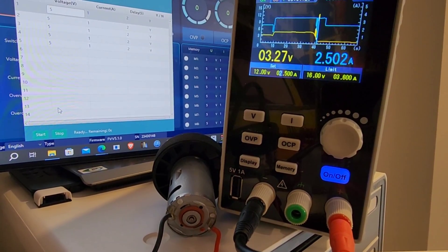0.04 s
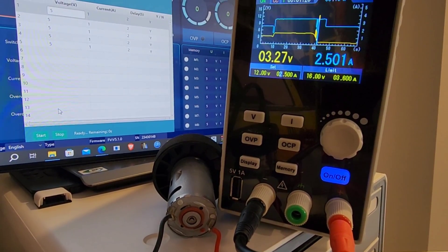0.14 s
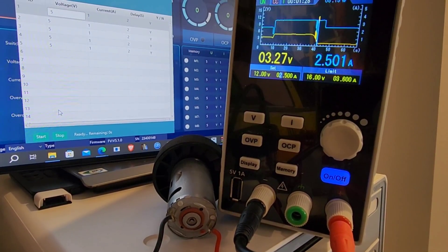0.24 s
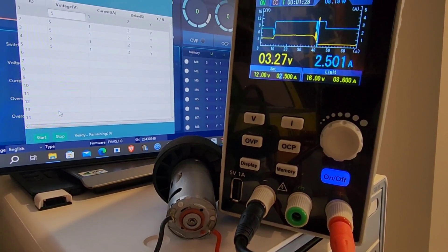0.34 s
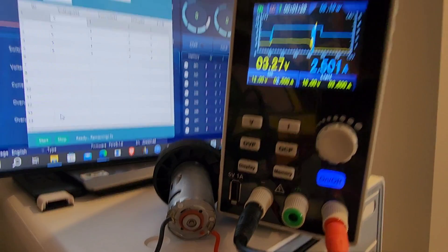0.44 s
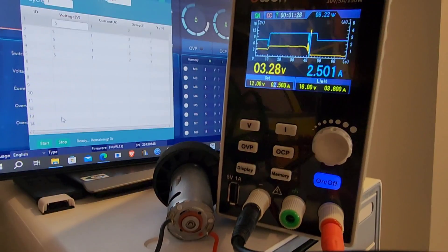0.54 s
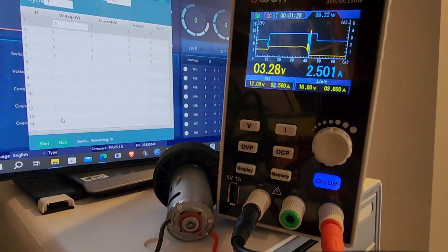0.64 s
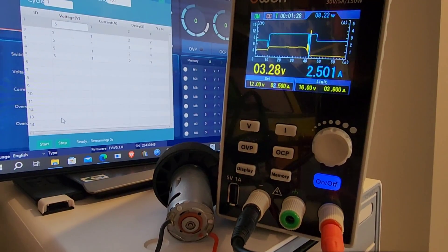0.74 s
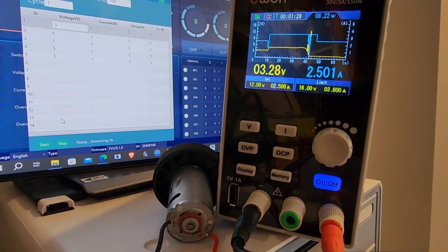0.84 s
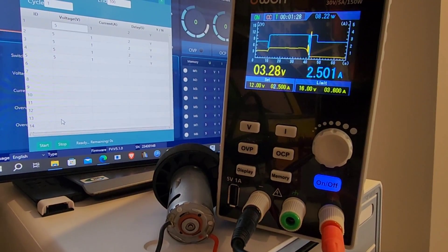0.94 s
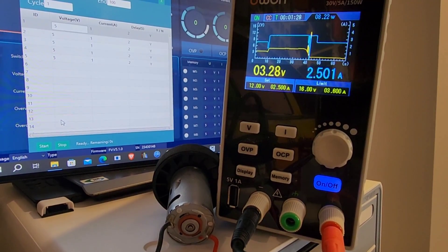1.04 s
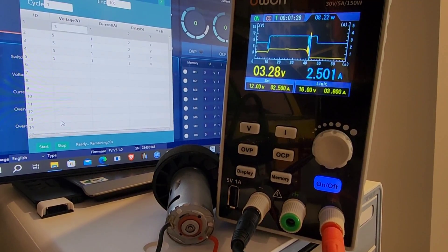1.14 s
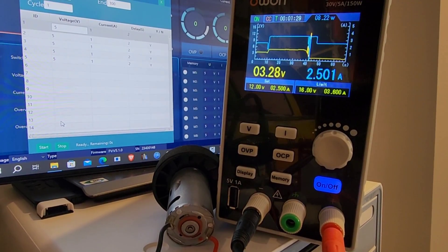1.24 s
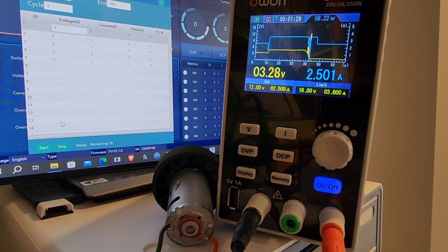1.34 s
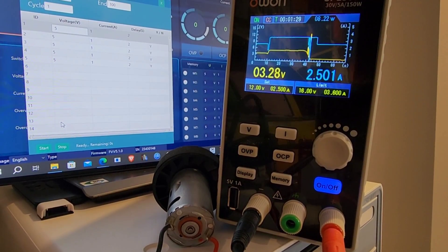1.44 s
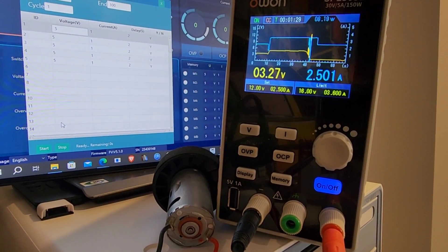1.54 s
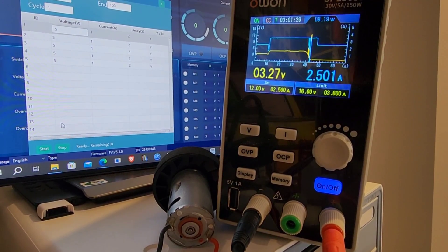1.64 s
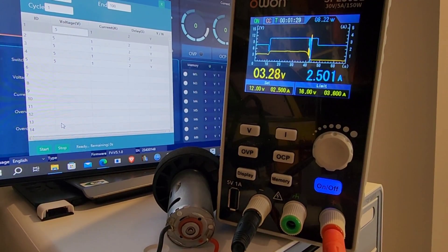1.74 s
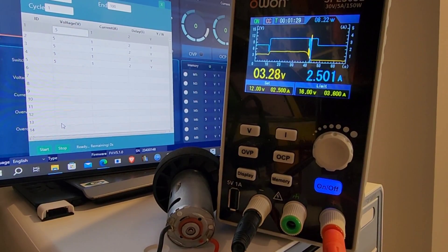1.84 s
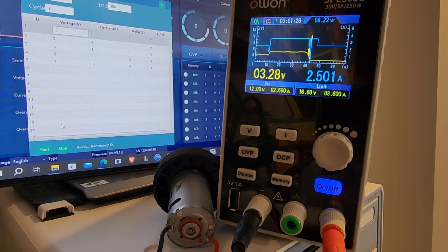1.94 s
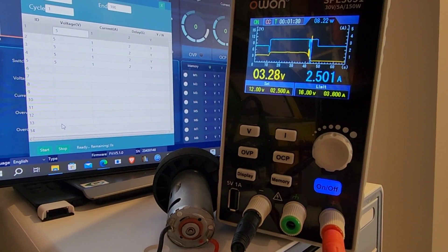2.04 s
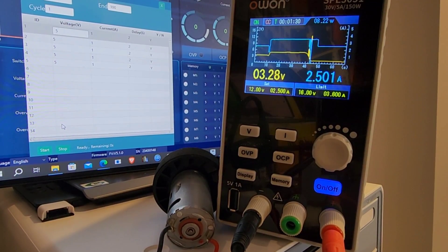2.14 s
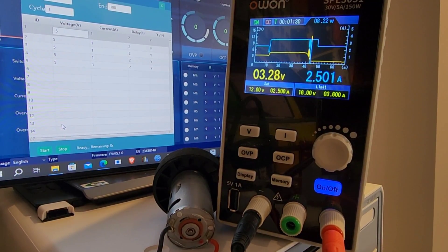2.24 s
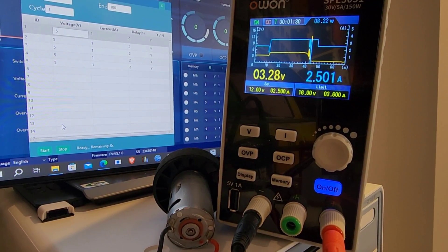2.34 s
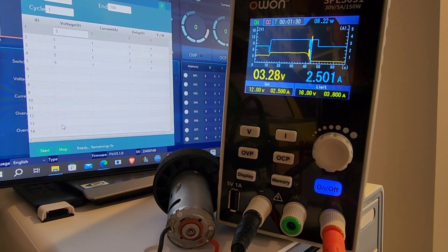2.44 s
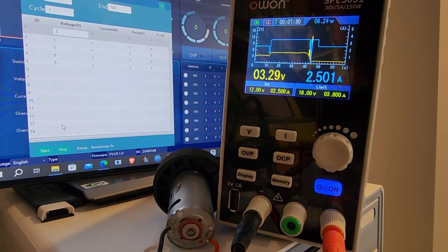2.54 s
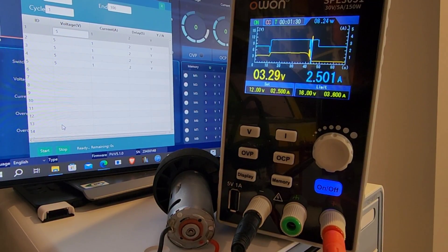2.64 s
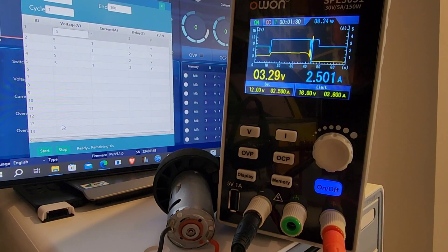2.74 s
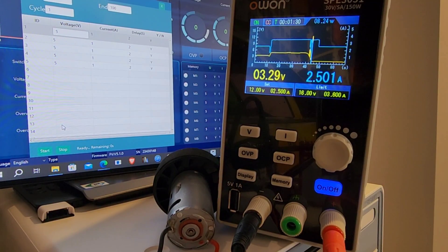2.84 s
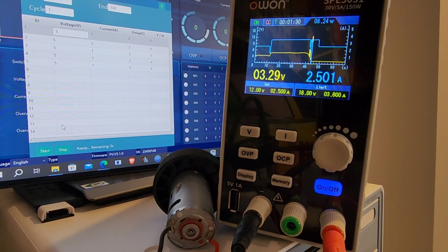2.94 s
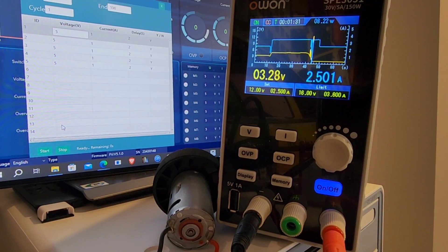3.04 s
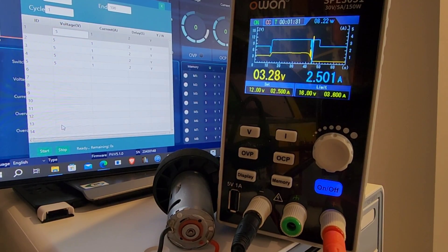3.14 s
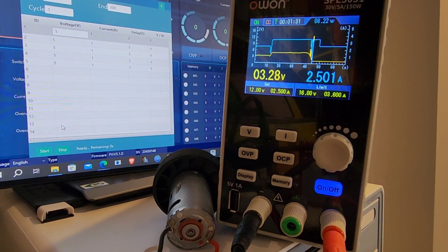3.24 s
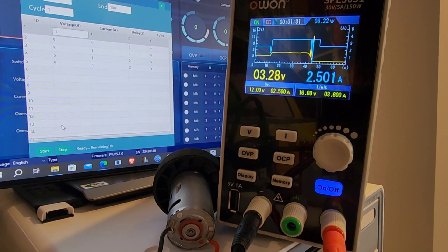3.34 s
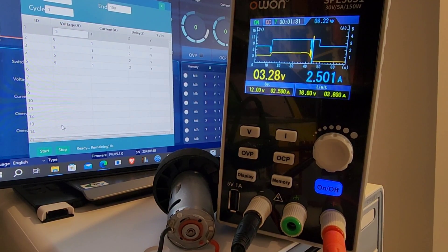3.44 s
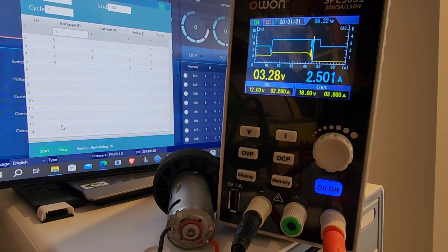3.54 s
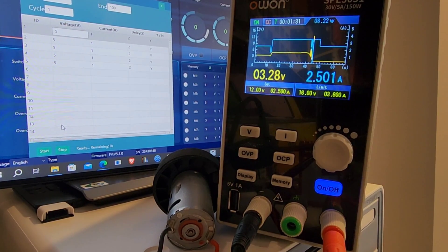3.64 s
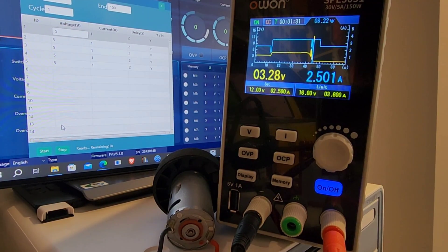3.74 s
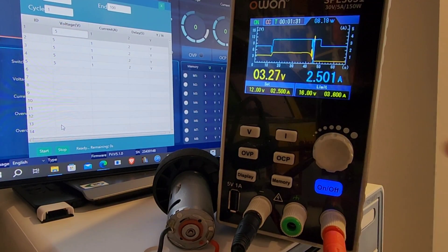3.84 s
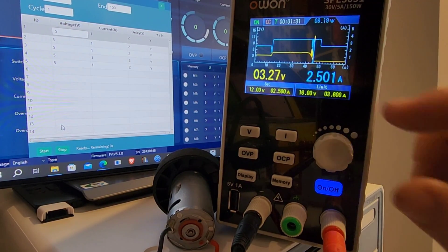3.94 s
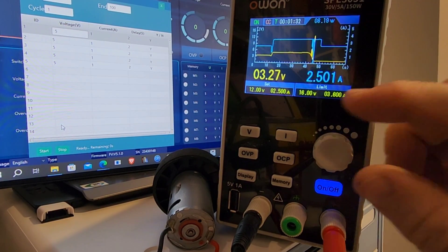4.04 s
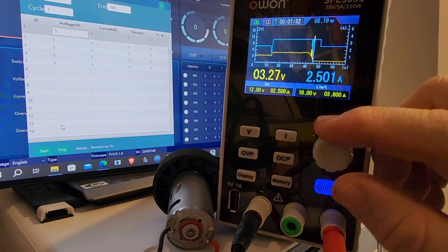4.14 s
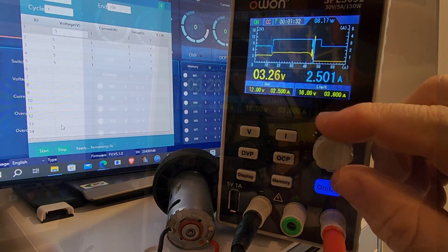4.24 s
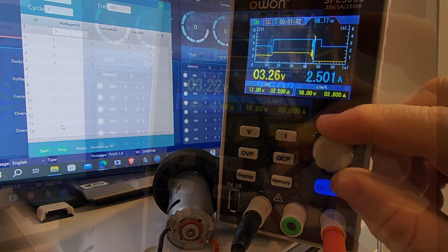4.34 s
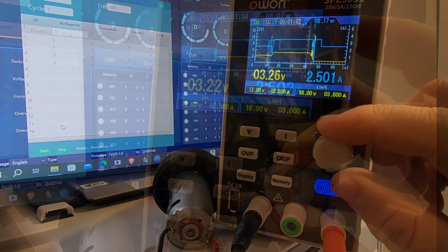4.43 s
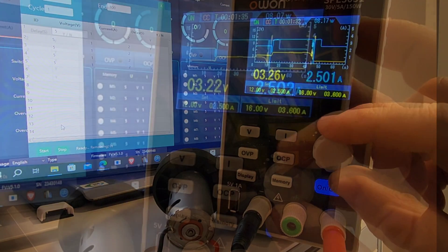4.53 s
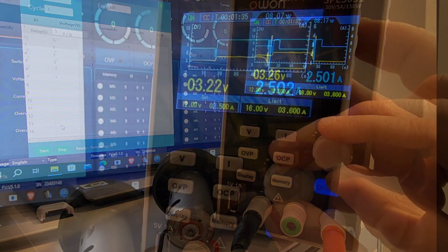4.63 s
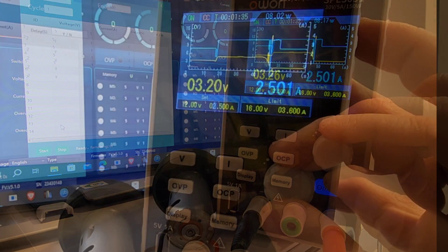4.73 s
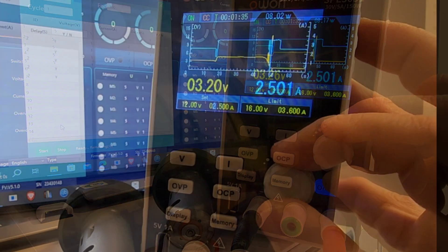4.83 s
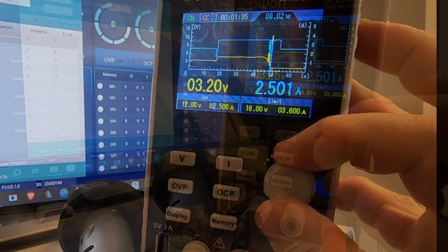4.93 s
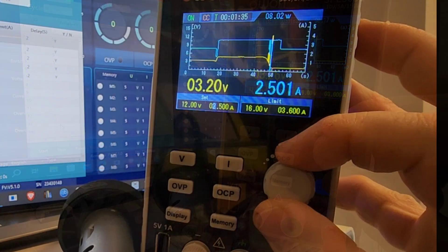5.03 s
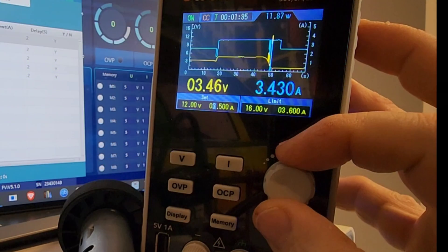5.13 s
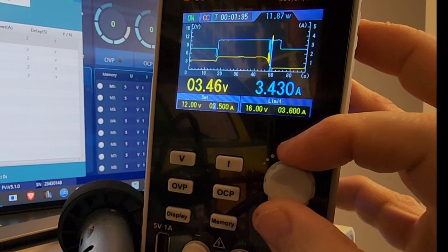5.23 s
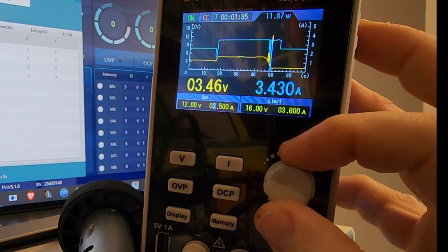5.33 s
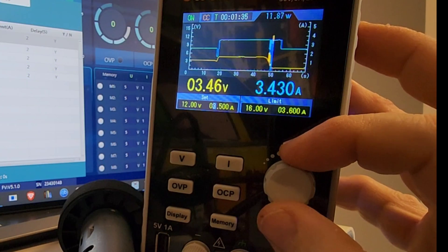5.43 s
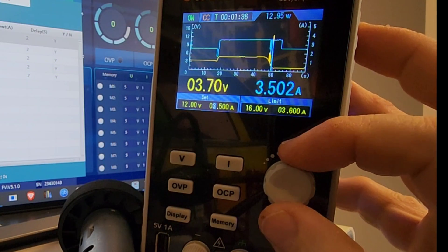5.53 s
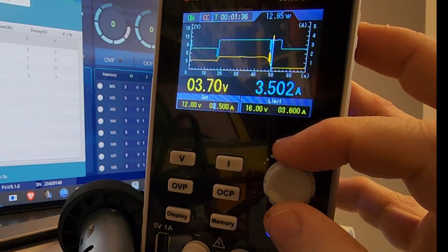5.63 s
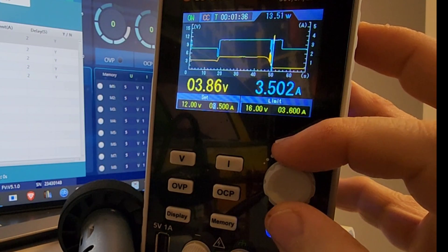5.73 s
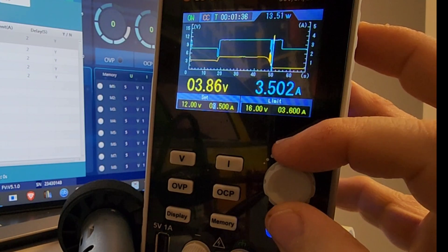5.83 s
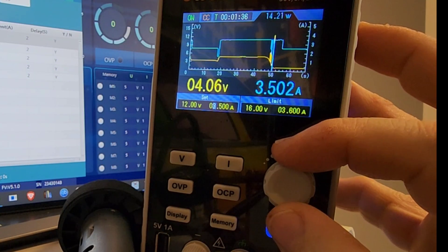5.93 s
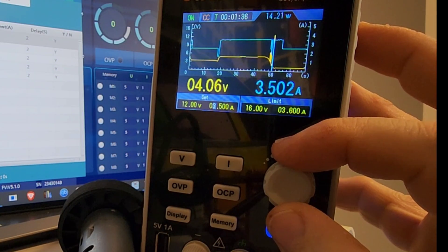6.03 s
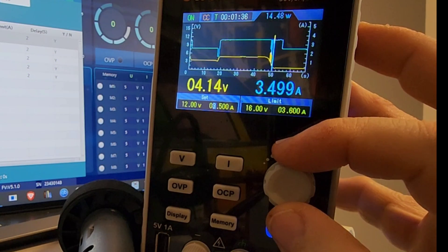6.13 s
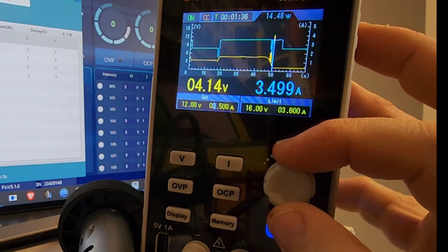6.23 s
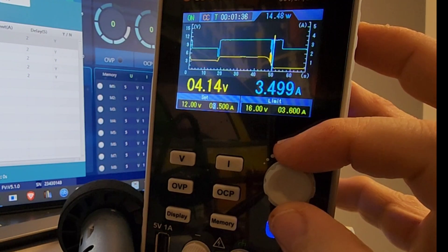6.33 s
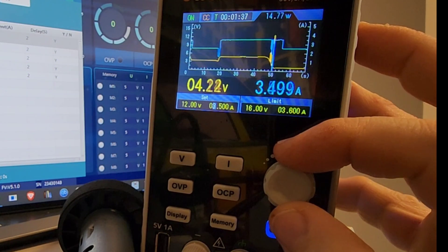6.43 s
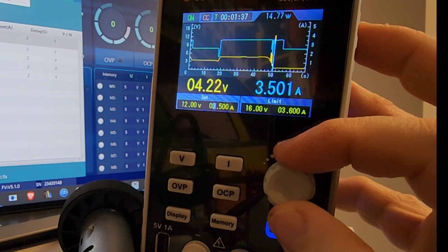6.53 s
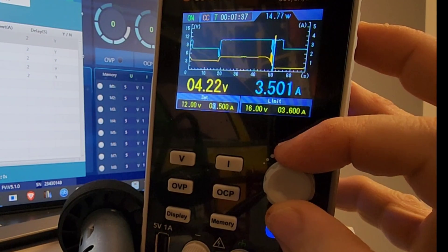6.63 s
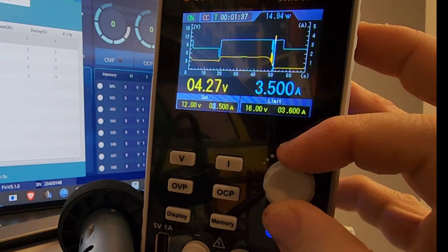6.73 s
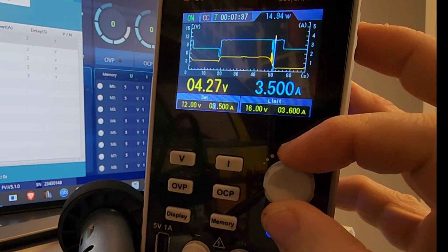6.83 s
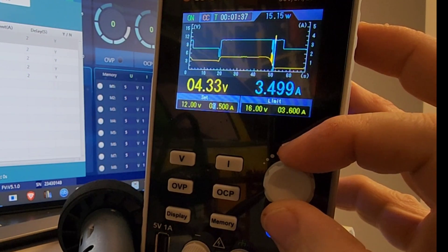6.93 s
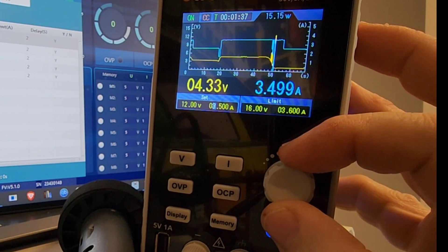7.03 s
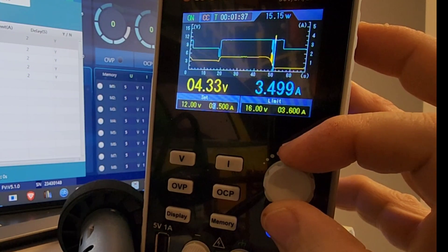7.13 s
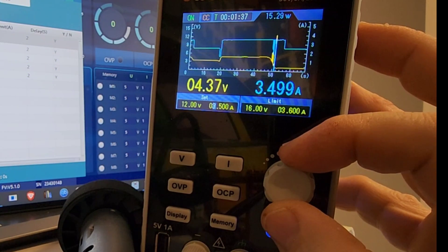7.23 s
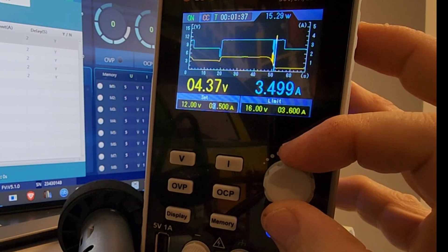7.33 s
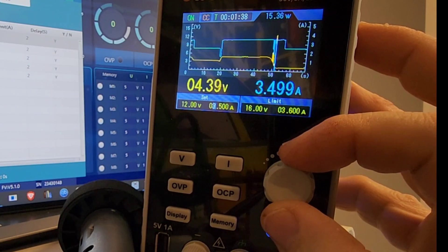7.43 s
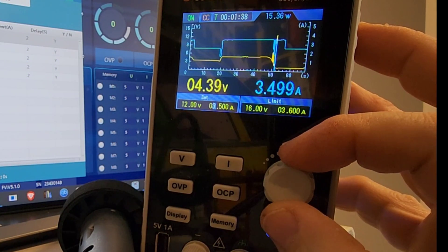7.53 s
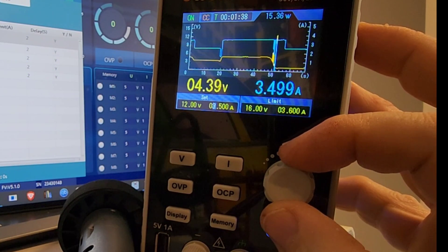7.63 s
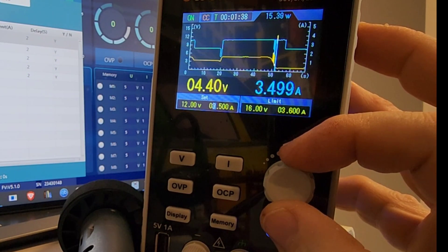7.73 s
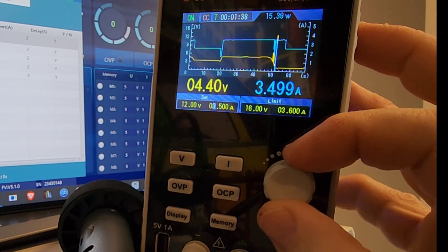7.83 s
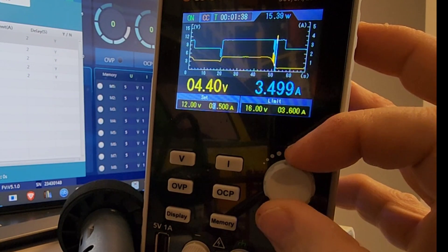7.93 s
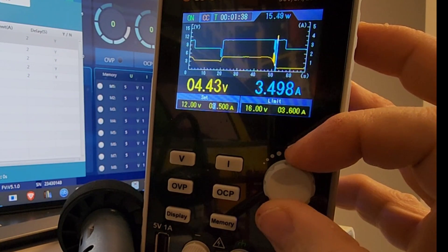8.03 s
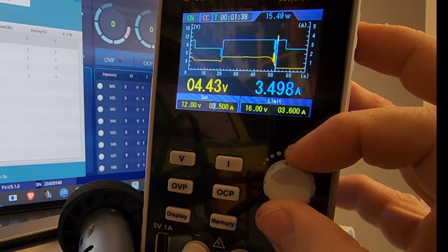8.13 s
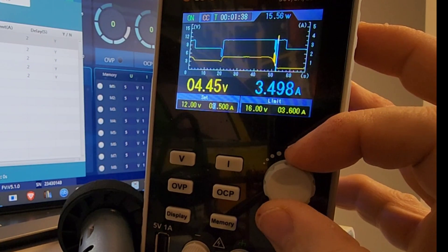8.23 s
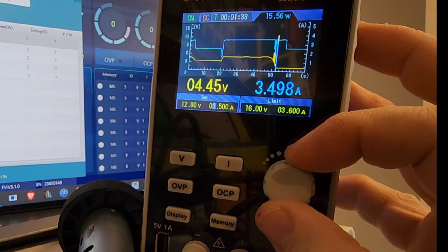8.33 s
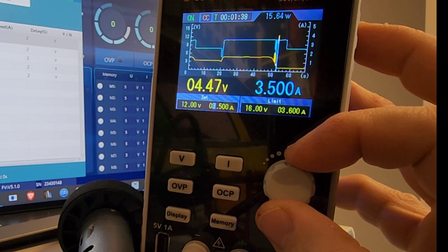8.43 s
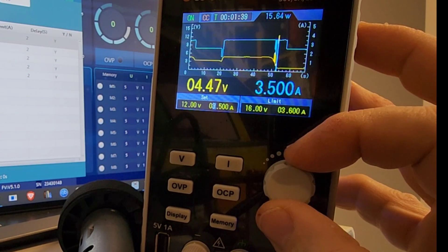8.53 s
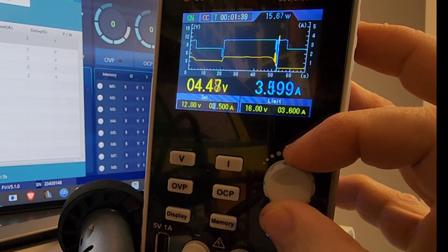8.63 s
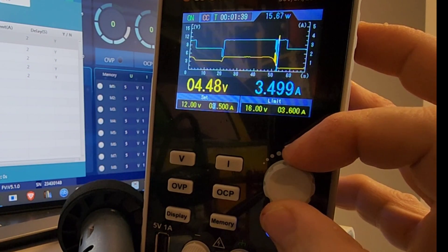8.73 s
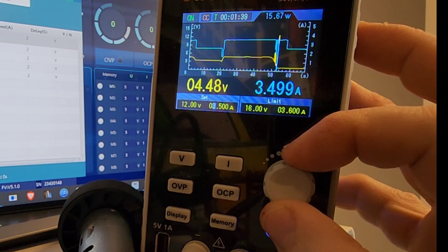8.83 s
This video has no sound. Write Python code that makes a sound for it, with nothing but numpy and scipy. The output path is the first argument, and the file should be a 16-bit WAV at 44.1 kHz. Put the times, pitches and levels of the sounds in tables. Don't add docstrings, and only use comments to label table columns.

```python
import sys
import numpy as np
from scipy import signal
from scipy.fft import rfft, irfft, next_fast_len
from scipy.io import wavfile

SR = 44100
rng = np.random.default_rng(int(sys.argv[2]) if len(sys.argv) > 2 else 0)


def boost_factor(decibels):
    exponent = np.asarray(decibels, float) / 20
    return 10 ** exponent


def to_wav(s):
    ch = np.atleast_2d(s).T
    pcm = np.round(np.clip(ch, -1, 1) * 32767)
    wavfile.write(sys.argv[1], SR, pcm.astype(np.int16))


N = 391166

# frequency in Hz, density in dB per Hz.
RUMBLE_SPECTRUM = [(11, -35), (18, -10), (38, -8), (54, 2), (76, -2), (162, -13.5), (232, -15.5),
                   (240, -15), (310, -45), (530, -120)]
# start in seconds, peak in dB, pitch in Hz, T60 in seconds.
THUDS = [(.04, -20, 89.5, 0.041), (.10, -16, 49.7, 0.19), (.365, -13, 60, 0.15), (0.425, -6, 110, .06),
         (.44, -9, 60, 0.096), (0.692, -6, 122, 0.021), (0.824, -12, 99, 0.029), (.945, -19, 130, 0.046),
         (1.975, -18, 51, .15), (2.088, -16, 50.7, 0.25), (2.802, -5, 70.5, 0.069), (2.901, -12, 55, .1),
         (3.122, -9.5, 47.7, 0.31), (3.152, -10, 55, 0.087), (3.23, -15, 59.4, 0.087),
         (3.68, -22, 200, .04), (3.755, -7, 150, 0.049), (3.849, -12, 55, .1)]
# centre in seconds, swell in dB, half length in seconds.
GRIP_SWELLS = [(0, 9, 0.076), (0.416, 12.5, 0.05), (.56, 9, 0.14), (1.6, -1, 0.23), (2.0, 3, 0.063),
               (2.153, 6, 0.053), (2.72, 5, .2), (3.15, 0.5, .15), (3.9, 3.5, 0.26), (5.62, 3, 0.13),
               (6.83, 3, .15), (7.4, 2.5, .2), (8.87, 1, .08)]
RUMBLE_DB, RUMBLE_DUCKS, DUCK_BELOW_DB = -36, 0.49, -12

# start in seconds, height re full scale, swing in Hz, decay in seconds, rise
# in seconds, share of outside sound let through.
KNOCK = [
    (.4759, 5.48, 50.2, .0044, .00375, .02),
    (.4889, 1.59, 67.5, .0021, .00067, .2),
    (.4952, -1.3, 122.5, .0024, .0001, .02),
    (.4985, .63, 40.8, .05, .00054, .3),
    (.5044, -7.0, 36.7, .0058, .00857, .01),
    (.519, -.45, 49.3, .0265, .0005, 1),
]
# time in seconds, level in dB.
LOUDNESS = [(0, -18.5), (.3, -15), (.47, -13.5), (.53, -22.5), (1.0, -22.5), (1.7, -22), (1.97, -17),
            (2.2, -15), (2.55, -13), (4.0, -13), (4.36, -13.5), (4.73, -16), (4.94, -15.5), (5.08, -13.5),
            (5.38, -11), (5.87, -9.5), (8.4, -10), (8.87, -10.5)]
# until in seconds, from in seconds.
POSE_S = (.47, .53, 2.9, 3.9, 4.3, 5.0)

DISSOLVE = (4.3, 5.06, 2.9, 4.695)
# time in seconds, speed in turns per second.
IDLE_SPEED = [(0, 272.4), (.5, 272.2), (2.5, 272.8), (3, 272.7), (4.3, 272.0)]
# gain in turns per second, time constant in seconds.
SETTLING = [
    (74.55, .7123),
    (35.51, 2.218),
]
TURN_UP_S, LATER_IDLE_HZ = 5.0465, 269.1
SLOW_HZ, FAST_HZ = 272, 368
SLIP_S = 5.252

# frequency in Hz, density in dB per Hz.
HISS_SLOW = [(230, -21.5), (430, -16), (620, -19.5), (950, -15), (1300, -15.5), (1750, -4), (2200, -5.5),
             (3000, -2), (3900, -1), (5000, -5), (7500, -19.5), (10500, -23.5), (11600, -34.5),
             (12200, -66)]
HISS_FAST = [(230, -18.5), (430, -13.5), (620, -22.5), (950, -16.5), (1300, -14.5), (1750, -5),
             (2200, -10.5), (3000, -3.5), (3900, -3.5), (5000, -4.5), (7500, -19.5), (10500, -22.5),
             (11600, -35), (12200, -75)]
# centre in Hz, width in Hz, lift in dB when slow, lift in dB when fast.
CAN_RESONANCES = [(1174, 73, 0, -9), (1846, 79, 5.5, 5), (2705, 110, 3.5, 7.5), (2977, 29, -3, -0.5),
                  (3063, 37, 6, 8), (3290, 86, -1, -1.5), (3528, 77, 5, 9.5), (3640, 53, 4.5, 5.5),
                  (3834, 84, 3.5, 4), (3980, 120, 4, 8), (4650, 84, 0.5, 6), (5087, 100, 3, 5.5),
                  (5240, 75, 5, 4.5), (6900, 87, 2, 0.5)]

FAINT_MULTIPLES = (4.113, 5.11, 5.225, 17, 19, 22, 23, 24, 28, 30)
# level in dB re hiss when slow, level in dB re hiss when fast.
FAINT_DB = [(-31.5, -33.5), (-34, -41), (-25, -42), (-22, -46), (-28, -38), (-46, -48), (-46, -38),
            (-46, -50), (-48, -46), (-33, -60)]

# level in dB before the knock, after it, leaning in, close up,
# gain in dB at full speed.
ROTOR_DB = [(-18.5, -17.5, -17.5, -19.5, 11), (-27.4, -26.8, -28, -34, 8), (-27, -29.5, -26.5, -16, 1.5),
            (-27, -30, -20, -18.5, -18)]
BEARING_DB = [(-36, -38, -36, -35.5, 1), (-36, -33, -33, -32, 1), (-34, -30.5, -34, -30, -1)]
SLOT_DB = [(-29, -29, -26, -31, 1), (-20, -19.5, -27, -24.5, 6), (-21, -20, -16, -16, -2.5),
           (-31, -24, -18.5, -24, 4), (-26, -38, -38, -34, 9.5), (-26, -21, -24, -25, -4),
           (-13.5, -9.5, -8, -12.5, -16), (-21, -23, -28, -24, -13), (-26, -21.5, -18, -28, -9),
           (-32, -32, -29, -29, -6)]
BAR_DB = [(-28.5, -24, -25, -25.5, 8.8), (-19.3, -16, -20.7, -19, 3.8)]

# centre in Hz, width in Hz, lift in dB.
BENCH_PATH = [(286, 12, 10), (300.4, 37, 6), (323, 8, -4.5), (345.4, 5.2, -15), (355.7, 5.6, 2),
              (588, 55, 6), (628, 10, -10), (676, 47, 10.5), (705, 6, -10), (724, 5.5, 7), (732, 4.5, -8.5),
              (828, 20, -18), (877, 31, -18), (963, 50, 0.5), (1040, 9, -2), (1080, 24, 6),
             (1124.7, 9.9, -28), (1166, 52, -9), (1280, 25, -15), (1460, 9, -11)]
SHIELD_PATH = [(642, 30, 8), (674, 30, 13.5), (710, 5, -6), (700, 4.5, 5), (758, 8, 5), (768, 9.2, 10),
               (1038, 38, 16.5), (1100, 18, 12), (1120, 6, -15), (1152, 4, -10), (1224, 82, 10),
               (1285, 20, -12), (1380, 39, 9), (1565, 8, -4)]
CAN_PATH = [(1700, 60, 1), (1815, 55, 9), (1935, 39, -11), (2010, 28, 4), (2120, 450, -6), (2140, 13, 6),
            (2207, 40, 1), (2310, 63, -22), (2400, 40, -17), (2610, 13, 4.5), (2670, 60, 11), (3110, 40, 4),
            (3180, 90, -7),
            (4040, 70, 3), (4330, 80, 2), (4550, 130, 11), (4720, 60, -4), (5100, 60, -3),
                (5500, 300, 3), (6000, 120, 12), (6700, 40, 12)]
COMMUTATOR_PATH = [(3700, 100, 6), (4100, 70, 6), (4310, 50, -9), (4426, 29, -10), (4458, 63, 9),
                   (4780, 60, 4), (4960, 50, -1), (5050, 30, -6), (5215, 25, 7.5)]


def in_time(rows):
    s, *columns = np.transpose(rows)
    return [np.interp(np.arange(N) / SR, s, c) for c in columns]


def rms_one(x):
    return x / np.sqrt(np.mean(x ** 2))


def drift(rate_hz):
    step = 64
    r = np.exp(-2 * np.pi * rate_hz * step / SR)
    slow = signal.lfilter([1], [1, -2 * r, r * r], rng.standard_normal(N // step + 1002))[1000:]
    return np.interp(np.arange(N) / step, np.arange(len(slow)), rms_one(slow - slow.mean()))


def resonant_lift(hz, path):
    return sum(lift_db / (1 + (2 * (hz - centre) / width) ** 2) for centre, width, lift_db in path)


def coloured(x, spectrum, peaks=()):
    size = next_fast_len(N)
    hz = np.maximum(np.arange(size // 2 + 1) * SR / size, 1)
    corner_hz, corner_db = np.transpose(spectrum)
    level_db = np.interp(np.log(hz), np.log(corner_hz), corner_db, right=-120)
    level_db = level_db + resonant_lift(hz, peaks)
    return rms_one(irfft(rfft(x, size) * boost_factor(level_db), size)[:N])


def grip_level(hiss_db):
    t = np.arange(N) / SR
    swells_db = sum(swell_db * np.exp(-((t - s) / half_s) ** 2) for s, swell_db, half_s in GRIP_SWELLS)
    return RUMBLE_DB + RUMBLE_DUCKS * np.minimum(hiss_db - DUCK_BELOW_DB, 0) + swells_db


def handling(rumble_db):
    out = boost_factor(rumble_db + 1.7 * drift(6.0) + 2.4) * coloured(rng.standard_normal(N), RUMBLE_SPECTRUM)
    for s, peak_db, hz, t60_s in THUDS:
        at, end = round(s * SR), round((s + t60_s) * SR)
        t = np.maximum(np.arange(N) / SR - s, 0)[at:end]
        envelope = boost_factor(peak_db - 60 * t / t60_s) * (1 - np.exp(-t / .002))
        out[at:at + len(t)] += envelope * np.sin(2 * np.pi * hz * t)
    return out


def knock():
    swing, let_through = np.zeros(N), np.ones(N)
    t = np.arange(round(.2 * SR)) / SR
    for s, height, hz, decay_s, rise_s, share in KNOCK:
        at = round(s * SR)
        left_over = swing[at] * np.exp(-t / rise_s)
        envelope = height * (1 - np.exp(-t / rise_s)) * np.exp(-t / decay_s)
        swing[at:at + len(t)] = left_over + envelope * np.cos(2 * np.pi * hz * t)
        let_through[at:] = share
    return swing, let_through


def rattle():
    t = np.arange(N) / SR
    loose = (t > KNOCK[3][0]) & (t < KNOCK[4][0])
    band = signal.butter(3, [4500, 10500], "band", fs=SR, output="sos")
    return boost_factor(-20.5) * signal.sosfilt(band, rng.standard_normal(N)) * loose


def spark_train(per_s, spread_db, base_db):
    hits = rng.random(N) < per_s / SR
    size_db = spread_db * np.minimum(rng.exponential(1, N), 3) + base_db
    return hits * boost_factor(size_db) * rng.choice([-1, 1], N)


def arcing():
    band = signal.butter(3, [6500, 11000], "band", fs=SR, output="sos")
    return rms_one(signal.sosfilt(band, spark_train(500, 4.4, 0)))


def brushes(turn, fast):
    pulse = 1 + 0.031 * np.cos(turn) + 0.039 * np.cos(2 * turn)
    pulse += fast * (0.046 * np.cos(3 * turn) + .04 * np.cos(7 * turn))
    waver_db = 0.44 * drift(48.0) + 0.39 * drift(5.3)
    rub = rng.standard_normal(N) * pulse * boost_factor(waver_db) + spark_train(400, 1.75, 7.5)
    can = np.array(CAN_RESONANCES)
    slow_hiss = coloured(rub, HISS_SLOW, can[:, [0, 1, 2]])
    fast_hiss = coloured(rub, HISS_FAST, can[:, [0, 1, 3]])
    return (1 - fast) * slow_hiss + fast * fast_hiss


def bench(x):
    t = np.arange(round(.08 * SR)) / SR
    echoes = rng.standard_normal((2, len(t))) * boost_factor(-60 * t / 0.13) * (t > .002)
    echoes *= boost_factor(-8.0) / np.sqrt(np.sum(echoes ** 2, axis=1, keepdims=True))
    here, there = (signal.fftconvolve(x, echo)[:N] for echo in echoes)
    angle = np.arange(N) / SR * .6
    return (x + np.cos(angle) * here + np.sin(angle) * there) / np.sqrt(1 + np.sum(echoes[0] ** 2))


def shaft_speed():
    t = np.arange(N) / SR
    since = np.maximum(t - TURN_UP_S, 0)
    later = LATER_IDLE_HZ + sum(gain * (1 - np.exp(-since / tau_s)) for gain, tau_s in SETTLING)
    return np.where(t < DISSOLVE[0], in_time(IDLE_SPEED)[0], later)


def line_levels(speed, fast, multiples, strengths, path):
    t, step, out = np.arange(N) / SR, 128, []
    coarse_t = t[::step]
    climbing = np.clip((coarse_t - TURN_UP_S) / .03, 0, 1)
    for multiple, (before, after, leaning, close, grown) in zip(multiples, strengths):
        pose_db = np.interp(coarse_t, POSE_S, [before, after, after, leaning, leaning, close])
        climb_db = grown * fast[::step] + resonant_lift(multiple * speed[::step], path)
        out.append(np.interp(t, coarse_t, pose_db + climbing * climb_db))
    return out


def orders(turn, multiples, levels_db, waver_db, blur):
    start, end, gap, cancel = DISSOLVE
    t, out = np.arange(N) / SR, np.zeros(N)
    both = slice(round(start * SR), round(end * SR))
    later = (t[both] - start) / (end - start)
    for multiple, level_db in zip(multiples, levels_db):
        phase = multiple * turn + blur * np.sqrt(multiple) * drift(10.5) + 2 * np.pi * rng.random()
        flip, gap_rate = np.pi * (multiple != 3), 2 * np.pi * multiple * gap
        phase[both.start:] += gap_rate * (cancel - start) + flip
        line = np.sin(phase)
        earlier = phase[both] + gap_rate * (t[both] - cancel) - flip
        line[both] = np.sqrt(later) * line[both] + np.sqrt(1 - later) * np.sin(earlier)
        out += np.sqrt(2) * boost_factor(level_db + waver_db * drift(10.3)) * line
    return out


def motor(hiss_db):
    speed = shaft_speed()
    turn = 2 * np.pi * np.cumsum(speed) / SR
    fast = np.clip((speed - SLOW_HZ) / (FAST_HZ - SLOW_HZ), 0, 1)
    skip = np.pi * np.clip((np.arange(N) / SR - SLIP_S) / .002, 0, 1)
    rotor, bearing = (1, 2, 3, 4), (2.113, 3.113, 4.228)
    slots, bars = (5, 6, 7, 9, 11, 13, 15, 16, 18, 21), (12, 14)

    rotor_db = line_levels(speed, fast, rotor, ROTOR_DB, BENCH_PATH)
    low = orders(turn + skip, rotor, hiss_db + rotor_db, waver_db=.5, blur=.03)

    singing_db = line_levels(speed, fast, bearing, BEARING_DB, SHIELD_PATH)
    singing_db += line_levels(speed, fast, slots, SLOT_DB, CAN_PATH)
    singing_db += line_levels(speed, fast, bars, BAR_DB, COMMUTATOR_PATH)
    singing = orders(turn, bearing + slots + bars, hiss_db + singing_db, waver_db=1.1, blur=0.06)

    faint_db = [hiss_db + slow + (quick - slow) * fast for slow, quick in FAINT_DB]
    faint = orders(turn, FAINT_MULTIPLES, faint_db, waver_db=-1.0, blur=0.052)

    halo = boost_factor(hiss_db - 19.5 + 10.2 * fast) * drift(67.0) * np.sin(7 * turn)
    hiss = bench(halo + boost_factor(hiss_db - 1.71) * brushes(turn, fast))
    return boost_factor(0.4) * low + singing + faint + hiss + boost_factor(hiss_db - 38.0) * arcing()


def scene():
    hiss_db, = in_time(LOUDNESS)
    swing, let_through = knock()
    outside = handling(grip_level(hiss_db)) + motor(hiss_db)
    return (outside * let_through + swing + rattle())[None]


def roll_off(x):
    return signal.sosfilt(signal.butter(12, 12290, fs=SR, output="sos"), x)


def record(dry):
    held = dry / (1 + np.abs(dry / 1.02) ** 6) ** (1 / 6)
    return roll_off(0.96 * held)


dry = scene()
out = record(dry)
to_wav(out)
```